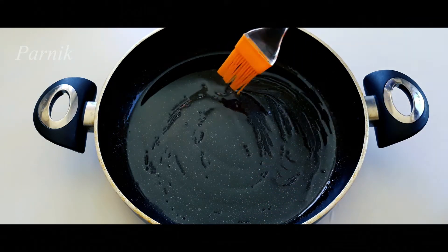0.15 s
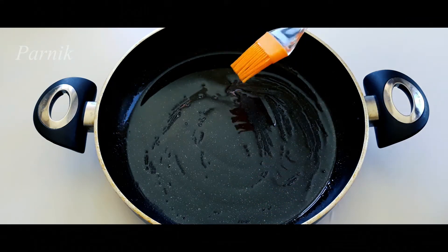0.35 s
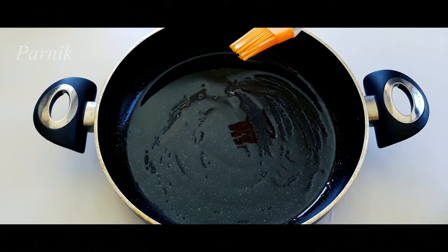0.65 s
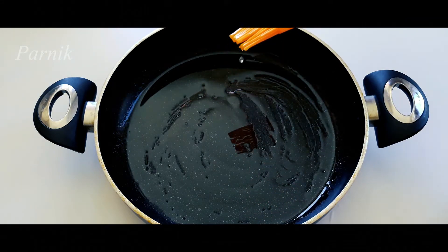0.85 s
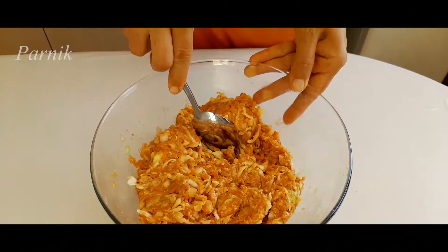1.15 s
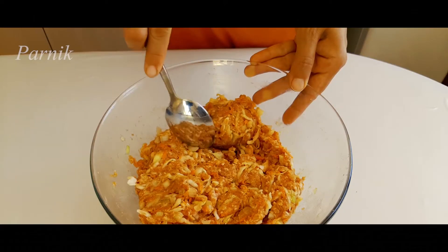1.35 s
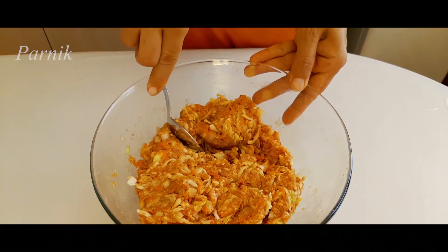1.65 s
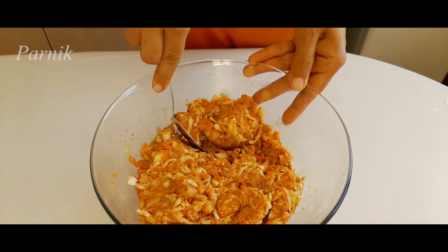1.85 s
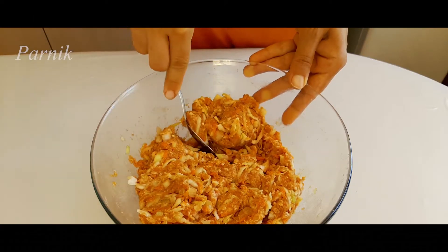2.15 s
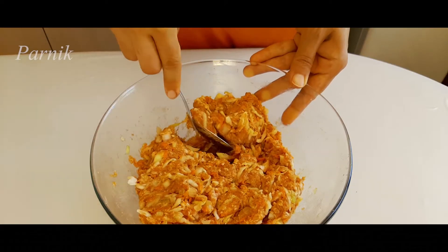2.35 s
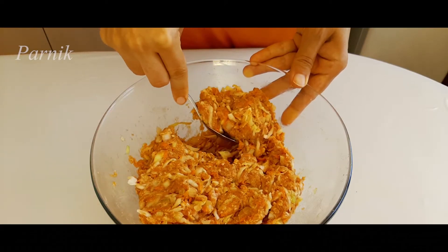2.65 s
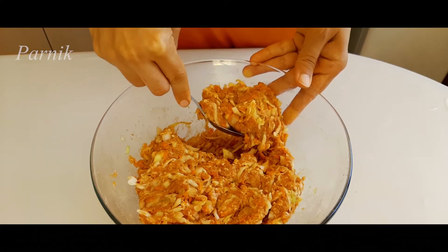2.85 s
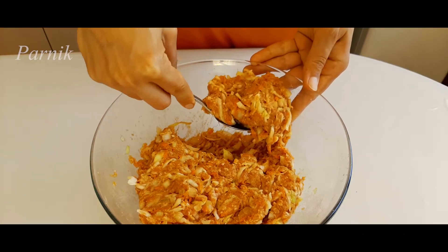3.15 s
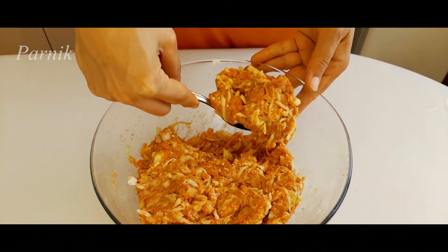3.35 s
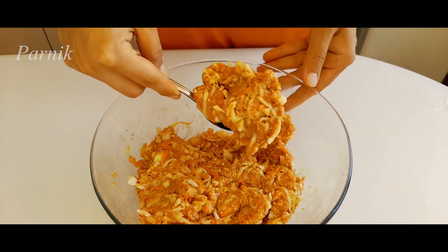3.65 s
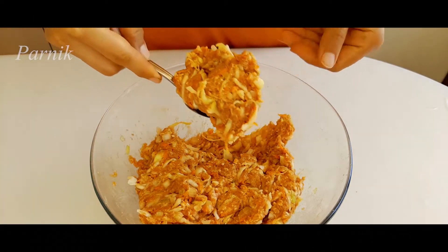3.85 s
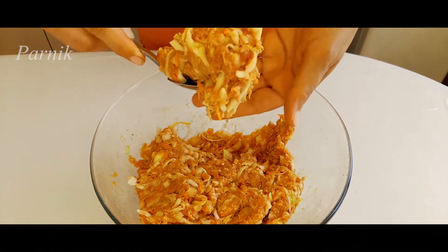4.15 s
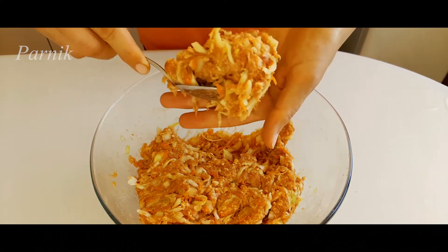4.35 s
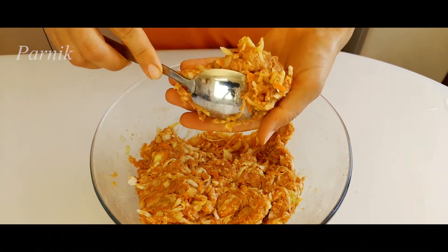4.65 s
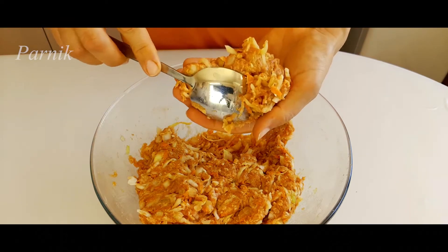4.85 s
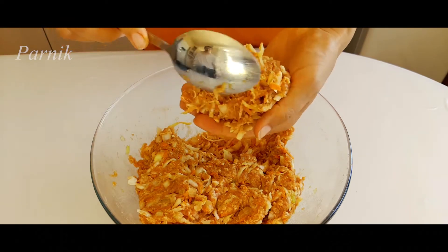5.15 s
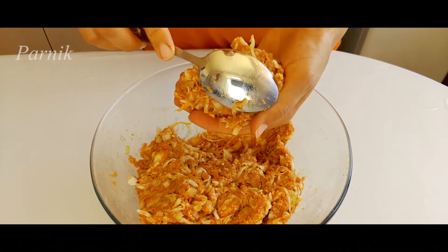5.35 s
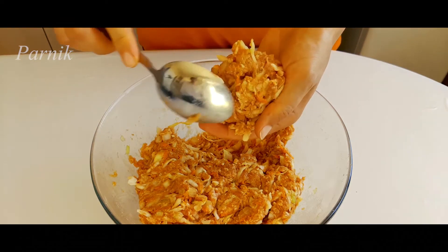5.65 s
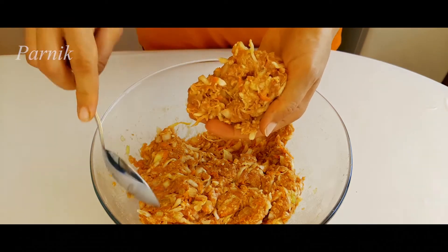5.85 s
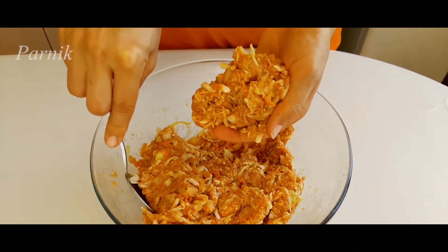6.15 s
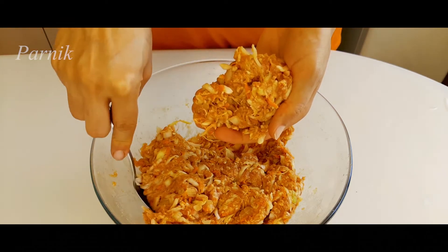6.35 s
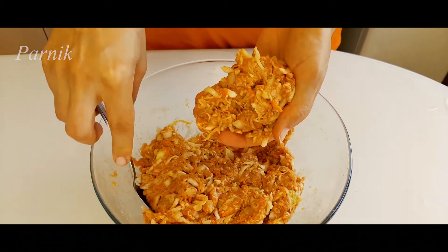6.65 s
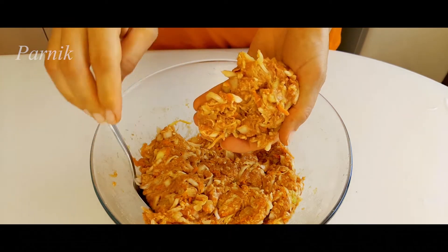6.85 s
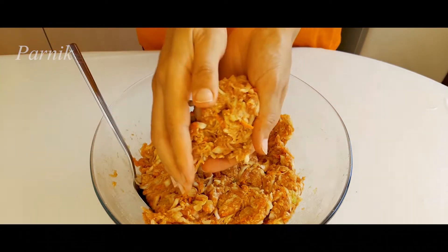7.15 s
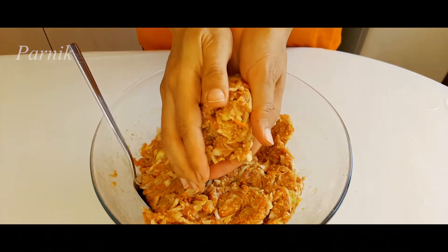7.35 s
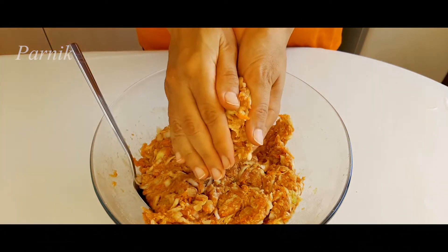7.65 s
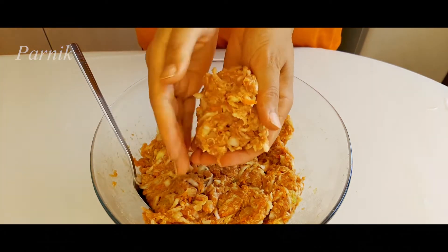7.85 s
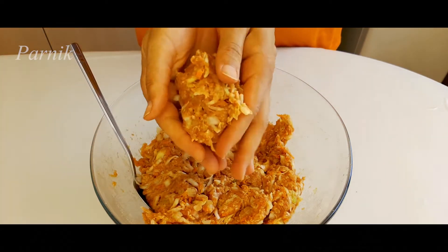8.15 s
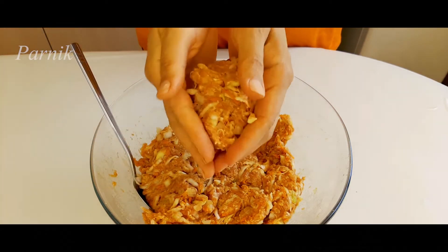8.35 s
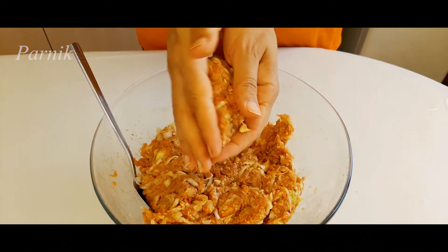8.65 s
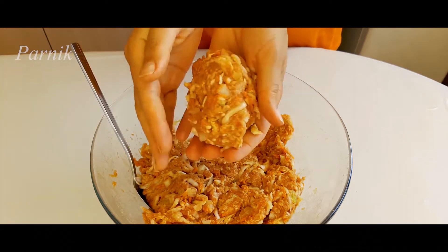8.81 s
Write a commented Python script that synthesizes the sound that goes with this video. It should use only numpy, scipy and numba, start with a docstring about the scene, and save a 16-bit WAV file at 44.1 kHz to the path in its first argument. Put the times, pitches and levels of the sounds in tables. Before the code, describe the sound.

A soft brush hisses and swishes through oil in a pan for about a second over a low hum. The sound cuts to a bowl of wet mince: a spoon digs with dense sticky crackle and bright pops, then near silence, a few faint touches, one sharp wet burst, and lighter hand squeezes. Close stereo microphones, slightly left, in a quiet kitchen with a short bright reverberation.

```python
"""Wet mince worked in a bowl by a spoon and two hands, close to a pair of microphones in a quiet kitchen.
Air pockets ring as short pops and pitched smacks over fine crackle; hard walls add a bright tail.
At first, at a pan, filtered noise makes the hiss and swish of a soft oiling brush and its dull scrape.
Low noise and a wavering tone make the hum; also faint whistles, dull table bumps and microphone hiss."""
import sys
import numpy as np
from scipy import signal
from scipy.fft import rfft, irfft, next_fast_len
from scipy.io import wavfile
from scipy.ndimage import uniform_filter1d
from numba import njit

SR = 44100
rng = np.random.default_rng(int(sys.argv[2]) if len(sys.argv) > 2 else 0)


def put_to_file(sound):
    """Save the sound as 16-bit audio at rate SR, in the file named by the first command-line argument."""
    columns = np.atleast_2d(sound).T  # one column per channel
    safe = np.clip(columns, -1, 1)
    whole_steps = np.round(safe * 32767)
    wavfile.write(sys.argv[1], SR, whole_steps.astype(np.int16))


def invert_db(x):
    """Field ratio 10**(x/20) for x, a level in decibels (scalar or array-like)."""
    u = np.asarray(x, float) / 20
    return 10 ** u


N = 396018
TIME = np.arange(N) / SR
BOWL_START_S = 1.068  # at the pan before this, at the bowl after it

# low background, before wavering and left-right lean: (time [s], hum level [dB], rumble level [dB])
AIR = [(0, -47.5, -66), (1.05, -57, -58.5), (1.6, -58, -58.5), (2.8, -59.5, -70), (3.3, -65.5, -70),
       (4.9, -63, -60), (5.7, -62, -66.5), (7.2, -59.5, -67.5), (8.3, -62, -64), (8.98, -58, -55.5)]
# thin drone inside the hum, before wavering and lean: (time [s], pitch [Hz], level [dB])
DRONE = [(1.1, 168, -74), (1.9, 159.4, -55.5), (2.9, 149.9, -73), (5.7, 139.4, -65.5), (6.7, 141.1, -91),
         (7.2, 139.3, -59.5), (8.98, 136.6, -66)]
# spectrum of the low hum: (frequency [Hz], level [dB])
HUM_SPECTRUM = [(90, -22), (120, -5.5), (140, -0.5), (220, -14), (330, -17), (450, -47.5)]
# spectrum of the rumble: (frequency [Hz], level [dB])
RUMBLE_SPECTRUM = [(28, -55), (42, -2), (65, 11), (95, 9), (130, -45)]
# spectrum of the microphones' hiss: (frequency [Hz], level [dB])
HISS_SPECTRUM = [(280, -8.5), (400, -6.5), (1200, -13.5), (4300, -19.5), (7600, -24.5), (8700, -28.5),
                 (11500, -19), (15500, -13.5), (16500, -12.5)]
# bristles stroked through oil: (start [s], length [s], level before smoothing and flutter [dB])
BRUSH_STROKES = [(0.36, 0.15, -54.5), (0.562, 0.19, -55), (0.797, 0.2, -55.5), (0.984, 0.11, -46)]
# faint thin whistles: (start [s], end [s], start pitch [Hz], end pitch [Hz], level before wavering [dB])
WHISTLES = [(0.657, 0.813, 1490, 1650, -63), (4.252, 4.443, 1470, 1464, -71)]
# fine crackle of each squeeze: (start [s], length [s], level before tear and clusters [dB], tilt [dB/octave])
CRACKLE = [(1.073, 0.065, -54, 2), (1.167, 0.087, -50.5, -4), (1.296, 0.34, -64, -1),
           (1.607, 0.13, -52, 1.5), (1.741, 0.12, -54, -4), (1.844, 0.17, -53.5, -3.5),
           (2.113, 0.098, -53.5, -4), (2.225, 0.21, -51, -2), (2.493, 0.074, -55, -2.5),
           (2.602, 0.18, -52, -2.5), (2.853, 0.17, -58, 0.5), (3.166, 0.17, -62, 6),
           (4.476, 0.054, -66, -2), (4.555, 0.15, -68, 3.5), (4.815, 0.19, -72, 9), (5.412, 0.11, -73.5, 7),
           (5.572, 0.051, -79, 18), (6.005, 0.13, -57, 5.5), (6.14, 0.091, -54, -1),
           (6.241, 0.16, -55.5, -2), (7.34, 0.21, -64.5, 0), (7.499, 0.095, -60.5, 4.5),
           (7.717, 0.059, -59.5, 11), (7.812, 0.15, -78.5, 16.5), (7.961, 0.14, -61, 5.5),
           (8.158, 0.08, -65.5, 3), (8.471, 0.14, -56.5, 3), (8.664, .16, -65, 11), (8.878, 0.1, -76, 14.5)]
# three sizes of small air pocket: (typical pitch [Hz], rate [bursts/s], share [dB])
POCKET_SIZES = [(1617, 600, -6), (5200, 900, -2.5), (11360, 800, -5)]
# loudest bursting pockets, dry and before the lean to a side: (time of peak [s], peak level [dB], pitch [Hz])
POPS = [(1.1517, -34.5, 4020), (1.1945, -34, 11500), (1.1992, -27.5, 3100), (1.2092, -25.5, 3840),
        (1.217, -31, 3470), (1.2328, -24, 1810), (1.2755, -35, 12500), (1.3134, -36, 8100),
        (1.4151, -34, 13700), (1.469, -35.5, 11800), (1.5435, -34.5, 7500), (1.574, -36, 6500),
        (1.5873, -30.5, 9100), (1.5957, -26.5, 7050), (1.6152, -31, 6140), (1.6336, -32, 6570),
        (1.654, -33, 6500), (1.714, -27, 11900), (1.7492, -33, 1940), (1.8237, -32.5, 2780),
        (1.848, -30, 6760), (1.852, -31, 13200), (1.9234, -21.5, 6340), (1.9612, -27, 5970),
        (1.9906, -28.5, 2740), (2.0137, -32, 7300), (2.0919, -34, 4270), (2.1176, -34.5, 2820),
        (2.1974, -30, 3300), (2.2095, -34.5, 1640), (2.2378, -32.5, 12100), (2.2478, -31, 7600),
        (2.2691, -31, 1610), (2.289, -33, 1680), (2.3001, -26.5, 1650), (2.3673, -21, 2640),
        (2.406, -32, 4360), (2.4323, -27, 1500), (2.468, -33, 4470), (2.6176, -33, 1410),
        (2.628, -28, 11800), (2.6534, -25, 4420), (2.661, -30, 1340), (2.695, -26, 5200),
        (2.7053, -28.5, 5170), (2.8444, -31, 4900), (2.906, -36.5, 1290), (2.9227, -29.5, 4990),
        (3.031, -41, 5760), (3.0964, -36, 4800), (3.097, -34.5, 11000), (3.1097, -29.5, 3860),
        (3.1741, -31.5, 7200), (3.3066, -33, 13200), (3.3782, -32, 11030), (3.3893, -26.5, 10400),
        (3.4355, -27.5, 6500), (4.4818, -35, 10100), (4.4978, -42, 4050), (4.567, -39, 2800),
        (4.6374, -37.5, 4400), (4.914, -29.5, 4040), (5.423, -45, 7600), (5.534, -50.5, 2680),
        (6.009, -34, 6070), (6.0572, -32, 7300), (6.1164, -33, 4650), (6.1555, -17.5, 4050),
        (6.247, -30.5, 5540), (6.289, -36.5, 5030), (6.3365, -26.5, 6100), (6.484, -48, 7200),
        (7.3467, -35.5, 5170), (7.376, -35, 4400), (7.392, -37.5, 4040), (7.433, -35, 3770),
        (7.4475, -35.5, 3485), (7.496, -33, 11800), (7.529, -36, 4300), (7.5573, -29, 6530),
        (7.5545, -34, 12100), (7.721, -44.5, 3330), (7.7373, -37.5, 6000), (7.7604, -24, 13700),
        (7.9293, -33.5, 13570), (7.9688, -42, 7680), (8.0385, -34.5, 12700), (8.451, -37.5, 7240),
        (8.6713, -39, 11400), (8.693, -33, 11940), (8.744, -34, 7700), (8.9206, -42.5, 6900),
        (8.9383, -31.5, 15600)]
# larger hollows that close, dry and before the lean: (time of peak [s], peak level [dB], pitch [Hz])
SMACKS = [(6.2445, -38.5, 1790), (6.2622, -36.5, 1730), (6.3662, -31.5, 1520), (6.542, -47, 1560),
          (7.4075, -48, 2090), (7.543, -48, 1900), (8.3279, -43.5, 1740), (8.5146, -46, 1780),
          (8.538, -46, 1800), (8.6802, -38, 2050)]
# decay of the kitchen: (frequency [Hz], time to fall 60 dB [s])
ROOM_DECAY = [(1000, 0.29), (4000, 0.38), (12000, 0.28)]
# nearest walls: (delay [s], level [dB])
WALL_ECHOES = [(.0085, -13.5)]
# response of the microphones to the mince: (frequency [Hz], gain [dB])
MICROPHONE = [(500, -5.5), (3000, 3), (7500, 6), (8800, 0), (10500, 4), (15000, 6)]
# nudges of the table, before the lean to the left: (time of peak [s], level [dB], swell length [s])
BUMPS = [(2.173, -49, 0.019), (2.457, -49, 0.055), (2.838, -41.5, 0.027), (6.465, -43.5, 0.059)]
# spectrum of a table bump: (frequency [Hz], level [dB])
BUMP_SPECTRUM = [(35, -42), (70, 13), (110, 13), (350, -34.5)]


def curve(rows, off_db=-120):
    s, *columns = np.transpose(rows)
    return np.array([np.interp(TIME, s, column, off_db, off_db) for column in columns])


def colour(x, points):
    """Filter by (frequency [Hz], gain [dB]) points joined over log frequency."""
    hz, db = np.transpose(points)
    size = next_fast_len(x.shape[-1])
    log_bins = np.log(np.maximum(np.fft.rfftfreq(size, 1 / SR), 1))
    gain = invert_db(np.interp(log_bins, np.log(hz), db))
    return irfft(rfft(x, size) * gain, size)[..., :x.shape[-1]]


def unit(x):
    """Scale to rms 1."""
    return x / np.sqrt(np.mean(x ** 2))


def walk(rate):
    """Random levels, rate per second, joined by straight ramps; rms 1."""
    hold = int(SR / rate)
    steps = np.repeat(rng.standard_normal(N // hold + 1), hold)
    return unit(uniform_filter1d(steps, hold)[:N])


def pair(alike):
    """Noise at two microphones whose correlation is alike."""
    alike = np.clip(alike, 0, 1)
    mid, side = rng.standard_normal((2, N))
    return np.sqrt(1 + alike) * mid + np.sqrt(1 - alike) * side * np.array([[1], [-1]])


def background():
    """Rumble and hum are nearly the same left and right; the hiss above them is almost unrelated."""
    hum_db, rumble_db = curve(AIR)
    bowl = TIME > BOWL_START_S
    left = np.array([[1], [-1]]) * bowl  # only at the bowl does the sound lean left
    rumble = unit(colour(pair(np.where(bowl, 0.9, 0.97)), RUMBLE_SPECTRUM))
    rumble = rumble * invert_db(rumble_db + 1.14 * walk(4.0))
    hum = unit(colour(pair(np.where(bowl, 0.85, 0.99)), HUM_SPECTRUM))
    hum = hum * invert_db(hum_db + 1.1 * walk(5.6))

    drone_hz, drone_db = curve(DRONE, off_db=None)
    phase = 2 * np.pi * np.cumsum(drone_hz + 1.67 * walk(8)) / SR
    drone = invert_db(drone_db + 2.1 * walk(5.5)) * np.sqrt(2) * np.sin(phase)

    hiss_db = np.where(bowl, -59.5, -63)
    hiss = unit(colour(pair(0.037), HISS_SPECTRUM)) * invert_db(hiss_db + 0.83 * left)
    return (rumble + hum + drone) * invert_db(3.04 * left) + hiss


def brush(hiss_db=-58, scrape_db=-59.5, edge_s=0.072):
    """Bristles on the pan hiss in a broad band, strokes add a brighter swish; the pan scrapes dully."""
    strokes = np.zeros(N)
    for start, length, db in BRUSH_STROKES:
        strokes += invert_db(db) * ((TIME > start) & (TIME < start + length))
    strokes = uniform_filter1d(strokes, int(edge_s * SR))
    hiss = colour(pair(0.87), [(1500, -1.5), (3500, -5.0), (8000, -3.0), (9500, -36), (15000, -6.5)])
    swish = colour(pair(0.96), [(2500, -14.0), (4000, -0.5), (8000, 1.5), (9500, -18.5), (14000, -6.0)])
    scrape = colour(pair(1.0), [(450, -1.0), (900, -2.5), (1500, -23.0)])
    flutter = invert_db(0.91 * walk(59.9))
    bristles = (unit(hiss) * invert_db(hiss_db) + unit(swish) * strokes) * flutter
    pan = unit(scrape) * invert_db(scrape_db + 1.3 * walk(16.6))
    return (bristles + pan) * (TIME < BOWL_START_S)


def whistles():
    """Short sine tones glide and waver in pitch and level."""
    out = np.zeros(N)
    for start, end, start_hz, end_hz, db in WHISTLES:
        shape = np.sin(np.pi * np.clip((TIME - start) / (end - start), 0, 1)) ** 0.5
        hz = np.interp(TIME, [start, end], [start_hz, end_hz]) + 25 * walk(90)
        out += invert_db(db + 2.0 * walk(60)) * shape * np.sin(2 * np.pi * np.cumsum(hz) / SR)
    return out * invert_db(np.array([[2.0], [-2.0]]))  # 2 dB up on the left, 2 dB down on the right


@njit
def bursts(at, hz, cycles, size, phase, length):
    """Each pocket swells softly, peaks after its number of cycles and rings out."""
    out = np.zeros(length)
    for e in range(len(at)):
        step = hz[e] / SR
        for i in range(min(int(6 * cycles[e] / step), length - at[e])):
            c = i * step / cycles[e]
            swell = c * c * np.exp(2 - 2 * c)
            out[at[e] + i] += size[e] * swell * np.sin(phase[e] + 2 * np.pi * i * step)
    return out


def crackle(spread_db=8.5, pitch_db=2.5, cycles=0.86, pan_db=2.5, edge_s=0.0018,
            tear_db=3, tear_s=0.01, cluster_db=4.0):
    """Countless small pockets of three sizes ring briefly, mostly faint, a few loud."""
    levels = np.zeros((3, N))
    typical_hz, _, share_db = np.transpose(POCKET_SIZES)
    for start, length, level_db, bright_db in CRACKLE:
        # a bright squeeze opens more small pockets than large ones
        db = level_db + share_db + bright_db * np.log2(typical_hz / typical_hz[1])
        since = TIME[:int(length * SR)]
        # the first tear of the wet film is the loudest moment
        tear = invert_db(tear_db * np.exp(-since / tear_s))
        at = int(start * SR)
        levels[:, at:at + len(since)] += (invert_db(db)[:, None] * tear)[:, :N - at]
    levels = uniform_filter1d(levels, int(edge_s * SR), axis=1)
    levels *= invert_db(cluster_db * walk(110))  # bursts come in clusters
    out = np.zeros((2, N))
    for (hz, rate, _), level in zip(POCKET_SIZES, levels):
        count = int(rate * N / SR)
        at = rng.integers(8, N - 8, count)
        size = invert_db(spread_db * np.minimum(rng.exponential(1, count), 1.9))
        pitch = np.clip(hz * invert_db(pitch_db * rng.standard_normal(count)), 1150, 16000)
        phase = rng.uniform(0, 2 * np.pi, count)
        lag = rng.integers(-4, 1, count)  # samples: early on the left, late on the right
        length = cycles * (pitch / 4000) ** 0.2
        scale = np.sqrt(rate * np.mean(size ** 2 * length / pitch))  # evens out rate and ring length
        for k, side in enumerate((1, -1)):
            gain = size / scale * level[at] * invert_db(side * pan_db / 2)
            out[k] += bursts(at + side * lag, pitch, length, gain, phase, N)
    return out


def pops(table=POPS, cycles=1.2, snap_db=-5, lead=2, apart_rad=0.83, pan_db=3.0, scatter_db=3.0,
         snap_ratio=1.575, snap_s=0.0008, bowl_hz=1325, bowl_db=-7, lift_s=3.15):
    """Each pocket rings at its pitch, a few samples earlier on the left; low ones lean more to the left."""
    s, db, hz = np.transpose(table)
    length_draw, phase_draw, lean_draw, bowl_draw = rng.standard_normal((4, len(s)))
    length = cycles * (hz / 4000) ** 0.44 * invert_db(1.1 * length_draw)
    lean_db = pan_db * np.minimum(4000 / hz, 2.5) ** 1.2 + scatter_db * lean_draw
    # the air in the bowl answers pockets above twice its pitch, less so the smallest,
    # until the mince is lifted out
    answer = (s < lift_s) / (1 + (hz / 6000) ** 4) * (hz > 2 * bowl_hz)
    # short waves come by many paths: a limit on how far the two microphones drift apart in phase
    excess = np.maximum(2 * np.pi * hz * lead / SR - apart_rad, 0)
    out = []
    for side in (0.97, -1):
        at = ((s - length / hz) * SR - side * lead).astype(np.int64)
        size = invert_db(db + side * lean_db / 2)
        ring = bursts(at, hz, length, size, 2 * phase_draw - side * excess, N)
        # the film tears in short snaps, mostly higher, drawn apart for each microphone
        late, shift, turn = rng.standard_normal((3, len(s)))
        snap_at = at + (snap_s * SR * np.abs(late)).astype(np.int64)
        snap_hz = np.minimum(hz * snap_ratio * invert_db(3.14 * shift), 15000)
        snap = bursts(snap_at, snap_hz, length, size * invert_db(snap_db), 2 * turn, N)
        bowl_size = size * answer * invert_db(bowl_db + side * 2.5)
        bowl = bursts(at, bowl_hz * invert_db(0.67 * bowl_draw), np.full(len(s), 0.67),
                      bowl_size, 2 * bowl_draw, N)
        out.append(ring + snap + bowl)
    return np.array(out)


def smacks():
    """Larger hollows close with a longer pitched ring and weaker snaps."""
    return pops(SMACKS, cycles=2.25, snap_db=-15)


def kitchen(x, tail_db=-4, onset_s=0.00061):
    """Direct sound, a near wall echo and a decaying noise tail at each microphone."""
    t = TIME[:SR // 2]
    hz, t60 = np.transpose(ROOM_DECAY)
    response = np.zeros((2, len(t)))
    for centre in 500 * 2 ** np.arange(0, 5.1, 0.5):
        edges = [centre / 1.19, min(centre * 1.19, 21000)]
        band = signal.butter(2, edges, "bandpass", fs=SR, output="sos")
        fade = invert_db(-60 * t / np.interp(np.log(centre), np.log(hz), t60))
        # long waves reach both microphones alike
        response += signal.sosfilt(band, pair(600 / centre)[:, :len(t)]) * fade
    response *= 1 - np.exp(-(t / onset_s) ** 2)
    response *= invert_db(tail_db) / np.sqrt(np.sum(response ** 2, axis=1, keepdims=True))
    for delay, db in WALL_ECHOES:
        response[[0, 1], int(delay * SR) + rng.integers(-9, 10, 2)] += invert_db(db)
    response[:, 0] += 1
    return signal.oaconvolve(x, response, axes=1)[:, :N]


def bowl_rub(mince):
    """The harder the mince is worked, the more the bowl rubs dully on the table."""
    power = uniform_filter1d(np.mean(mince ** 2, axis=0), int(0.09 * SR))
    effort = np.sqrt(np.abs(power))
    rub = unit(colour(pair(0.55), [(130, -18), (220, 0), (340, -2.0), (480, -18)]))
    return effort * invert_db(-17) * rub


def table_bumps():
    """Nudges of the table are dull swells of low noise."""
    swell = sum(invert_db(db) * np.exp(-((TIME - s) / length) ** 2) for s, db, length in BUMPS)
    bump = swell * unit(colour(rng.standard_normal(N), BUMP_SPECTRUM))
    return bump * invert_db(np.array([[2.0], [-2.0]]))  # 2 dB up on the left, 2 dB down on the right


def scene():
    """Mince in the room, over the brush, the background, whistles and bumps."""
    mince = colour(kitchen(crackle() + pops() + smacks()), MICROPHONE)
    return mince + bowl_rub(mince) + background() + brush() + whistles() + table_bumps()


def band_limit(x):
    """A steep low-pass at the top of the band."""
    return signal.sosfilt(signal.butter(12, 16990, fs=SR, output="sos"), x)


def record(dry):
    """A steep low-pass takes the top off the microphones' sound above 15.9 kHz, by at least 22 dB."""
    low_pass = signal.ellip(8, 0.2, 22, 15900, fs=SR, output="sos")
    finished = signal.sosfilt(low_pass, dry)
    return band_limit(finished)


dry = scene()
out = record(dry)
put_to_file(out)
```